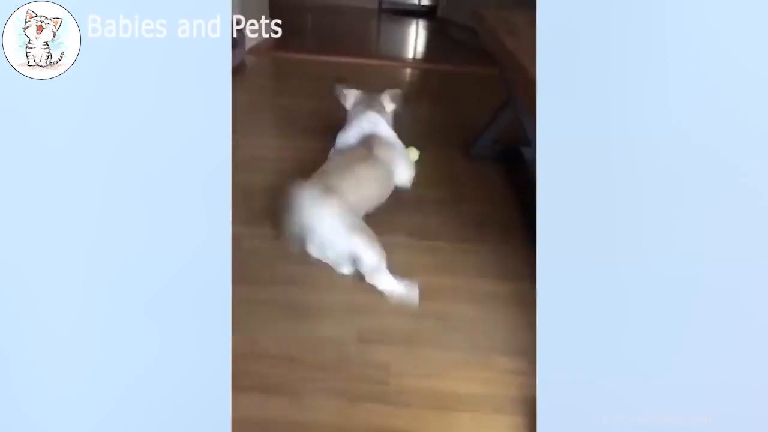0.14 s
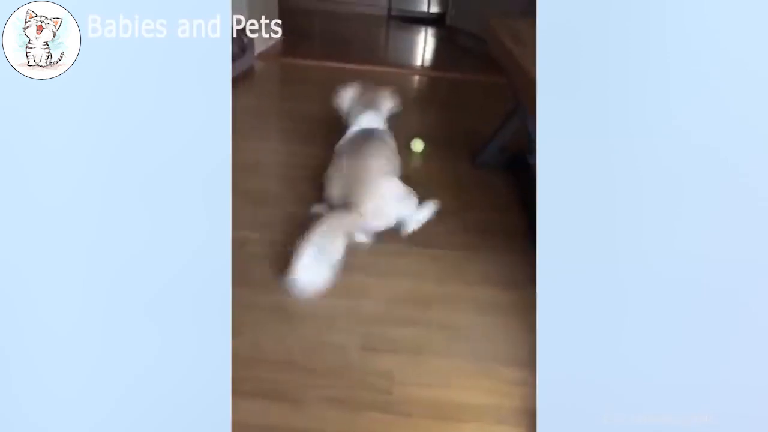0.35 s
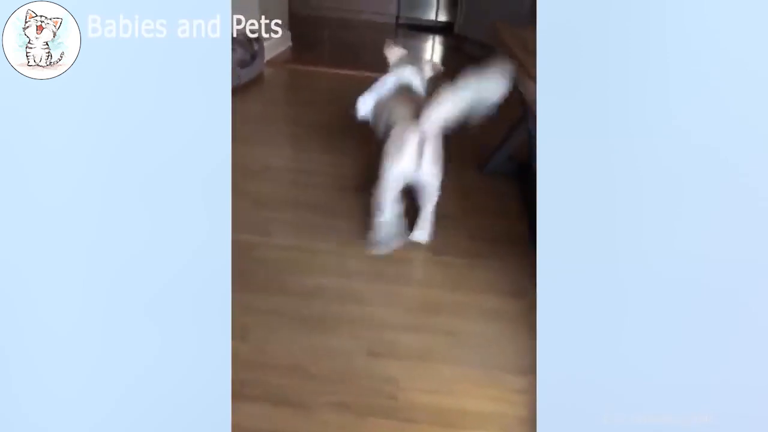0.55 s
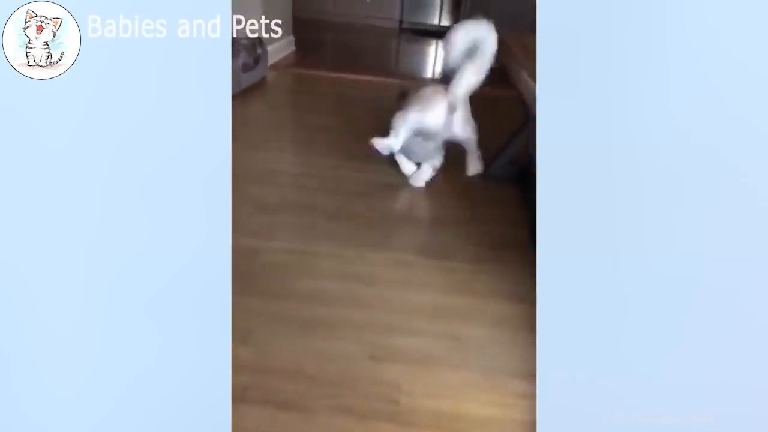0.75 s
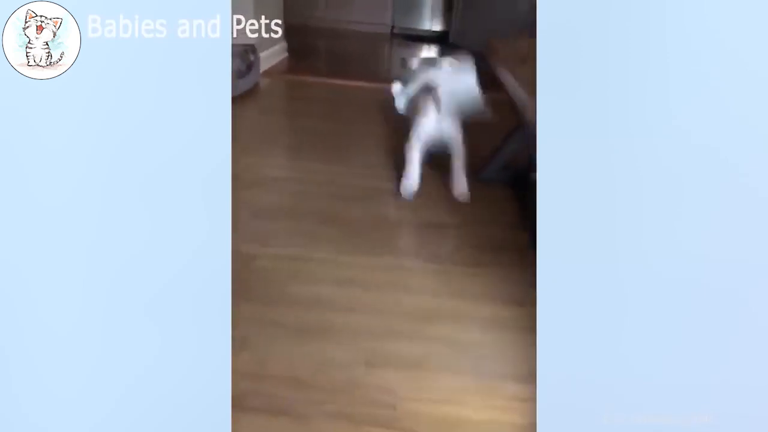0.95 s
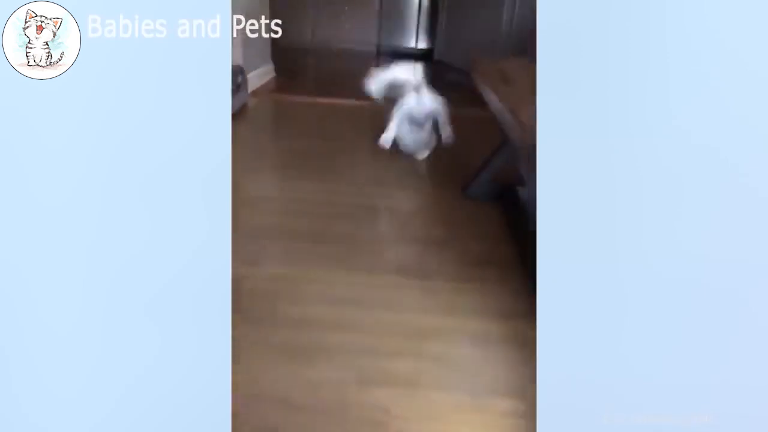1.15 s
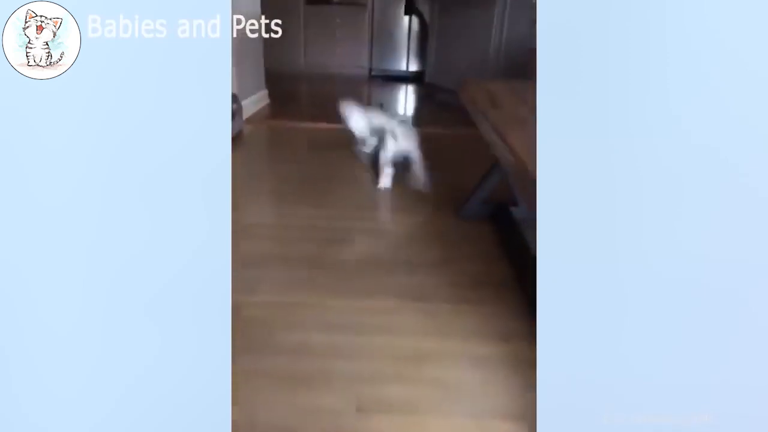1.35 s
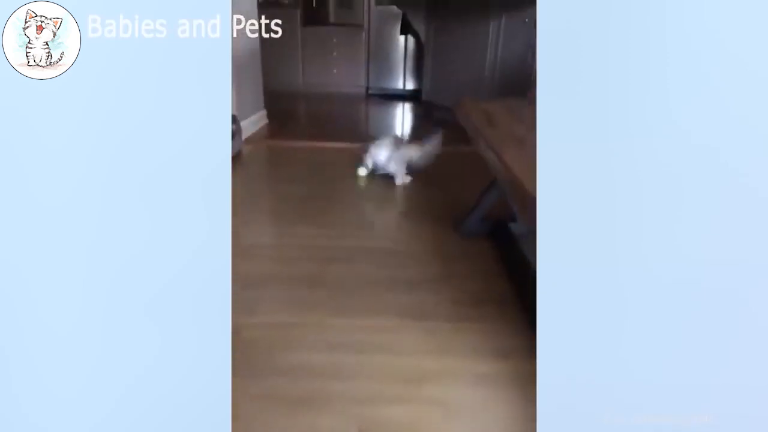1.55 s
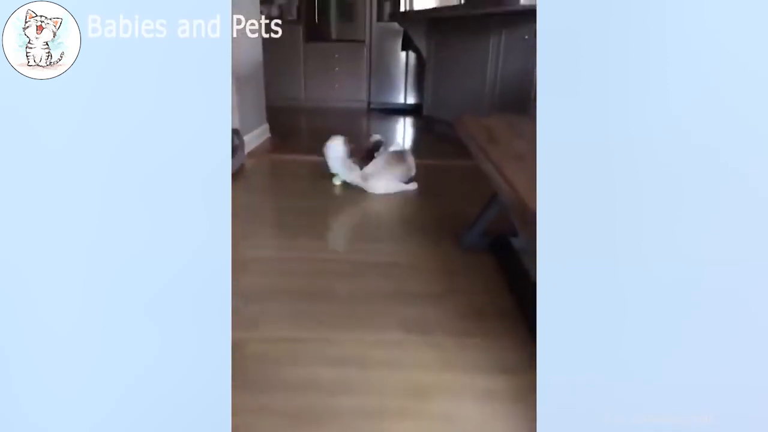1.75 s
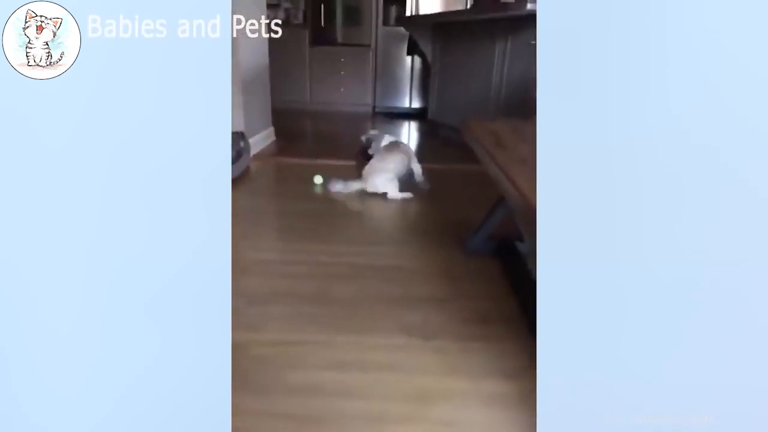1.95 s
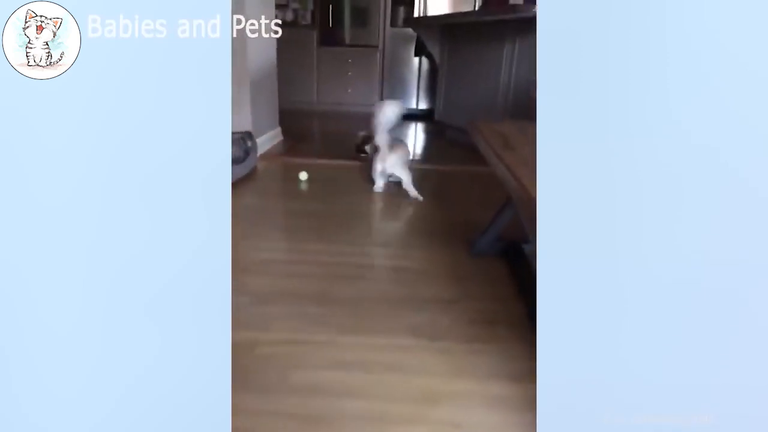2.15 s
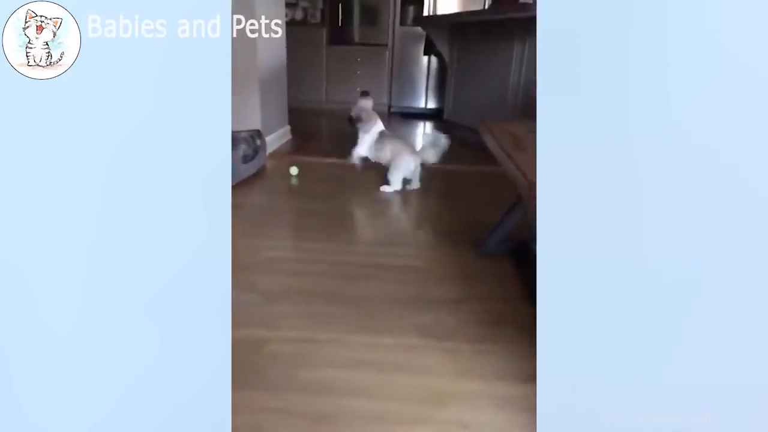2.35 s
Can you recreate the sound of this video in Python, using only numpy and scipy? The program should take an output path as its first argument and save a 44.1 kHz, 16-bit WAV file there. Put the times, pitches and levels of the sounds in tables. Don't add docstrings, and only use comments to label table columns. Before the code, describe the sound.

Dog claws clatter close by on hollow floorboards, with padded paw thuds and two hard bumps in the first second, then sparser, more roomy ticks, a dull body flop and last light taps, on a small microphone.

```python
import sys
import numpy as np
from scipy import signal
from scipy.fft import rfft, irfft
from scipy.io import wavfile
from scipy.ndimage import uniform_filter1d

SR = 44100
rng = np.random.default_rng(int(sys.argv[2]) if len(sys.argv) > 2 else 0)


def gain_from_db(level_db):
    decades = np.asarray(level_db, float) / 20
    return 10 ** decades


def unload_audio(sound):
    columns = np.transpose(np.atleast_2d(sound))
    steps = np.round(np.clip(columns, -1, 1) * 32767)
    wavfile.write(sys.argv[1], SR, steps.astype(np.int16))


N = 105840
LEAD = SR // 10
CLAW_DELAY = 40

# freq_hz, level_db_per_hz
RUMBLE_SPECTRUM = [(15, -47), (25, 2), (70, 4.5), (185, -17.5), (1520, -23.5), (1640, -23), (4240, -28),
                   (8630, -33.5), (13500, -53)]
# freq_hz, q, level_db
HOUSE_MODES = [(53, 1.3, -45), (71, 1.33, -47), (83.3, 1.33, -51)]
# freq_hz, t60_s
ROOM_DECAY = [(60, 0.35), (250, 0.6), (700, 0.28), (1800, 0.4), (5000, 0.35), (13000, 0.26)]
# delay_s, level_db
ECHOES = [(.0022, -25.5), (.005, -13.5), (.0085, -16.5), (.013, -21), (.021, -30.5)]
# start_s, level_db, pitch_hz, length_s
PAW_THUDS = [(0.225, -35, 77, 0.044), (0.422, -24, 138.7, 0.027), (0.464, -30, 67, 0.058),
             (0.782, -19.5, 71, .08), (0.893, -27.5, 51, 0.046), (1.03, -32, 84, 0.026),
             (1.149, -20.5, 94, 0.017), (1.397, -25, 176, 0.036), (1.43, -20, 149, 0.025),
             (1.54, -18.5, 133, 0.048), (1.696, -32.5, 108, 0.12), (1.98, -39.5, 62, 0.036),
             (2.238, -36.5, 115.5, 0.046)]
# start_s, level_db, pitch_hz, length_s
BODY_ROLL = [
    (1.785, -21, 50, .2),
    (1.8, -30, 170, .1),
    (1.84, -26, 103, .07),
]
# freq_hz, level_db, t60_s
BOARD_MODES = [(49, -13, .5), (75, 0, .18), (90, -14, .1), (188, -13, .05), (270, -12, .05),
               (315, -14, .15), (420, -6, .05), (680, -13, .04)]
# start_s, level_db, tick_db, tick_hz, room_send_db
BODY_KNOCKS = [
    (.1155, -37.5, 10.5, 880, -27),
    (.219, -29, 14.5, 1170, -1),
    (0.3637, -6.5, -3, 1204, -8.5),
    (0.6643, -26, 9, 1560, -6),
    (0.6939, -0.5, 3.5, 1165, -3.5),
    (1.788, -19.5, -15, 590, -2),
    (1.919, -50, 16, 605, -27),
    (2.168, -26, 1.5, 900, 3),
]
# start_s, length_s, level_db, centre_hz
SKIDS = [(.0, 0.043, -31.5, 3700), (0.623, 0.022, -23.5, 4050), (1.047, 0.095, -37.5, 3860),
         (1.439, 0.1, -36.5, 3230), (1.538, 0.052, -31.5, 3280), (1.742, 0.036, -48, 3640),
         (2.211, 0.1, -34.5, 4170)]
# freq_hz, level_db
CLAW_COLOUR = [(180, -24), (300, -14), (2340, -3.5), (3490, -7.5), (4150, -6), (8640, -11), (11200, -13),
               (13500, -19)]
# peak_db, ring_hz, brightness_db_per_octave, room_send_db
EARLIER_CLAW = (-7.5, 5000, 6, -1.5)
# start_s, peak_db, ring_hz, brightness_db_per_octave,
# room_send_db
CLAWS = [(0.0795, -14, 4870, 1.8, -0.5), (0.114, -15, 4900, 1.8, -10.5), (0.2188, -3, 5440, 2.3, -4),
         (0.362, -17, 1630, -3, -24), (0.4277, -17.5, 1490, -2.8, 1), (0.452, -12, 4300, -0.5, -4.5),
         (0.4732, -12, 3570, -0.2, -2), (0.495, -23.5, 4620, -1.5, 4), (0.5194, -11, 4400, 1.5, 2),
         (0.532, -8.5, 3020, 1.3, -3.5), (0.622, -10.5, 1690, 0.7, 2.5), (0.8322, -11, 6700, 3.5, 1.5),
         (0.867, -13.5, 4540, 3.2, -7.5),
         (.2188, -8, 11000, 3, -6), (.6685, -9, 5400, .5, -2), (.6758, -14, 6300, 1.5, -3),
               (.6898, -9, 4500, -.7, -1), (.6912, -6, 8000, .5, -3), (.6925, -4, 6200, -.7, -2),
               (.6962, -7, 2900, -2, 4),
         (0.9978, -4, 3950, 0.83, -2), (1.0245, -40, 4650, 2.1, -11), (1.0433, -5.5, 4610, 2, -0.5),
             (1.1108, -16, 2610, 1.9, -8), (1.1436, 2, 3930, 1.4, -2), (1.2503, -15, 6000, 2.7, 1),
             (1.3943, -4, 3800, 6.3, 2.5), (1.4267, -7, 2040, 5.1, 4), (1.5354, -3, 5100, 0.83, 1),
             (1.5506, -8.5, 4100, 2.5, -3), (1.6354, -14, 5600, 2, 6), (1.6725, -22, 2930, 1.6, 13),
             (1.738, -11, 3390, 2.2, 5), (1.8549, -15.5, 4230, 6.6, 2.5), (1.9014, -23, 4620, 2.2, 0),
             (1.921, -21.5, 3140, 2.5, 9), (2.2145, -18, 4040, 1.6, 9), (2.2583, -13.5, 4160, 0.84, 0)]


def evened(x):
    return x / np.sqrt(np.mean(x ** 2) + 1e-20)


def read(points, hz):
    f, value = np.transpose(points)
    return np.interp(np.log(hz + 1), np.log(f + 1), value)


def ring(x, hz, q):
    return signal.lfilter(*signal.iirpeak(min(hz, 15000), max(q, .3), SR), x)


def add(mix, start_s, sound, send_db):
    start = LEAD + round(start_s * SR)
    part = mix[:, start:][:, :sound.shape[-1]]
    part += sound[..., :part.shape[1]] * gain_from_db(np.array([[0], [send_db]]))


def rumble():
    f = np.fft.rfftfreq(N, 1 / SR)
    hiss = irfft(rfft(rng.standard_normal(N)) * gain_from_db(read(RUMBLE_SPECTRUM, f)), N)
    out = gain_from_db(-38) * evened(hiss)
    for hz, q, level_db in HOUSE_MODES:
        hum = ring(ring(rng.standard_normal(N), hz, q), hz, q)
        out = out + gain_from_db(level_db) * evened(hum)
    return out


def room(direct, send):
    tail_db, build_s, turn_rad_per_s = -5, 0.024, 9
    out = 0
    turn = np.arange(len(send)) / SR * turn_rad_per_s
    for window in (np.cos(turn), np.sin(turn)):
        hz, t, z = signal.stft(rng.standard_normal(SR), SR, nperseg=256)
        decay = gain_from_db(-60 * t / read(ROOM_DECAY, hz)[:, None])
        tail = signal.istft(z * decay, SR, nperseg=256)[1][:SR]
        tail = tail * (1 - np.exp(-np.arange(SR) / SR / build_s))
        tail = gain_from_db(tail_db) * tail / np.linalg.norm(tail)
        out = out + signal.fftconvolve(send * window, tail)[:len(send)]
    for k, (delay_s, level_db) in enumerate(ECHOES):
        out = out + (-1) ** k * gain_from_db(level_db) * np.roll(direct, round(delay_s * SR))
    return out


def thud(level_db, hz, length_s):
    q, wide_db = 3, -10
    t = np.arange(SR // 2) / SR
    wide = signal.lfilter(*signal.butter(1, 350, fs=SR), rng.standard_normal(len(t)))
    shape = t / length_s * np.exp(1 - t / length_s * 3.17) * 2.23
    tone = np.sin(2 * np.pi * hz * t) + .4 * evened(ring(wide, hz, q))
    return gain_from_db(level_db) * shape * (tone + gain_from_db(wide_db) * evened(wide))


def knock(level_db, tick_db, tick_hz):
    tick_s, tick_lag_s = .0007, .0012
    push_s, push_lag_s, push_db = .0007, .0056, 1.5
    boards_db, boards_send_db, board_lag_s, board_rise_s = -5, -8, .0085, .0006
    rattle_db, rattle_t60_s, rattle_hz = -14, .18, 420
    t = np.arange(SR // 2) / SR
    tick = np.sin(2 * np.pi * tick_hz * t) * gain_from_db(tick_db)
    tick = tick * np.exp(-.5 * ((t - tick_lag_s) / tick_s) ** 2)
    push = -gain_from_db(push_db) * np.exp(-.5 * ((t - push_lag_s) / push_s) ** 2)
    u = np.maximum(t - board_lag_s, 0)
    boards = np.zeros(len(t))
    for hz, mode_db, t60_s in BOARD_MODES:
        boards += gain_from_db(mode_db - 60 * u / t60_s) * np.sin(2 * np.pi * hz * u)
    rattle = evened(ring(rng.standard_normal(len(t)), rattle_hz, 1.0))
    rattle = rattle * gain_from_db(rattle_db - 60 * u / rattle_t60_s)
    boards = boards / abs(boards).max() + rattle
    boards = gain_from_db(boards_db) * boards * (1 - np.exp(-u / board_rise_s))
    return gain_from_db(level_db) * (tick + push + boards * gain_from_db(np.array([[0], [boards_send_db]])))


def skid(length_s, level_db, hz):
    slips_per_s, slip_db, q = 3000, 2.5, .7
    t = np.arange(0, length_s, 1 / SR)
    chance, side, size = rng.random((3, len(t)))
    slips = (chance < slips_per_s / SR) * np.sign(side - .5)
    slips = slips * gain_from_db(-slip_db * np.log(size + .03))
    scrape = evened(ring(ring(slips, hz, q), hz, q))
    return gain_from_db(level_db) * scrape * np.sqrt(np.sin(np.pi * (t / length_s) ** .4))


def claw(level_db, hz, bright_db):
    gain_db, rise_s, t60_s, longer_per_db = 3, .0002, .026, .35
    chatter_db, snap_db, snap_t60_s = 2.5, 11, .005
    q, ring_db, room_ring_db = 6, -6, -10
    t = np.arange(1024) / SR
    noise, chatter = rng.standard_normal((2, 1024))
    chatter = chatter_db * evened(uniform_filter1d(chatter, size=24))
    decay_s = t60_s * gain_from_db(longer_per_db * level_db)
    burst = noise * gain_from_db(chatter - 60 * t / decay_s) * (1 - np.exp(-t / rise_s))
    burst = burst * (1 + gain_from_db(snap_db - 60 * t / snap_t60_s))
    f = np.fft.rfftfreq(1024, 1 / SR)
    tilt_db = bright_db * np.log2(np.clip(f, 500, 14000) / 4000)
    colour = gain_from_db(read(CLAW_COLOUR, f) + tilt_db)
    click = np.eye(1, 1024)[0]
    near, far = irfft(rfft(np.roll([burst, click], shift=CLAW_DELAY, axis=1)) * colour)
    near = evened(near) + gain_from_db(ring_db) * evened(ring(near, hz, q))
    far = evened(far) + gain_from_db(room_ring_db) * evened(ring(far, hz, q))
    return gain_from_db(level_db + gain_db) * np.array([near, far]) / abs(near).max()


def scene():
    mix = np.zeros((2, N + LEAD))
    for start_s, *row in PAW_THUDS + BODY_ROLL:
        add(mix, start_s, thud(*row), -7)
    for start_s, *row, send_db in BODY_KNOCKS:
        add(mix, start_s, knock(*row), send_db)
    for start_s, *row in SKIDS:
        add(mix, start_s, skid(*row), 1.5)
    earlier = [(-.03, *EARLIER_CLAW)]
    for start_s, *row, send_db in earlier + CLAWS:
        add(mix, start_s - CLAW_DELAY / SR, claw(*row), send_db)
    wet = mix[0] + room(*mix)
    return (wet[LEAD:] + rumble())[None]


def low_pass(x):
    return signal.sosfilt(signal.butter(12, 14280, fs=SR, output="sos"), x)


def record(dry):
    low_hz, edge_hz, leak_db = 42, 13300, -40
    x = signal.sosfilt(signal.butter(4, low_hz, "high", fs=SR, output="sos"), dry)
    x = np.clip(x, -1, 1)
    lowpass = signal.firwin(255, edge_hz, window=("kaiser", 8), fs=SR)
    cut = signal.oaconvolve(x, lowpass[None], "same")
    mix = cut + gain_from_db(leak_db) * (x - cut)
    return low_pass(mix)


dry = scene()
out = record(dry)
unload_audio(out)
```